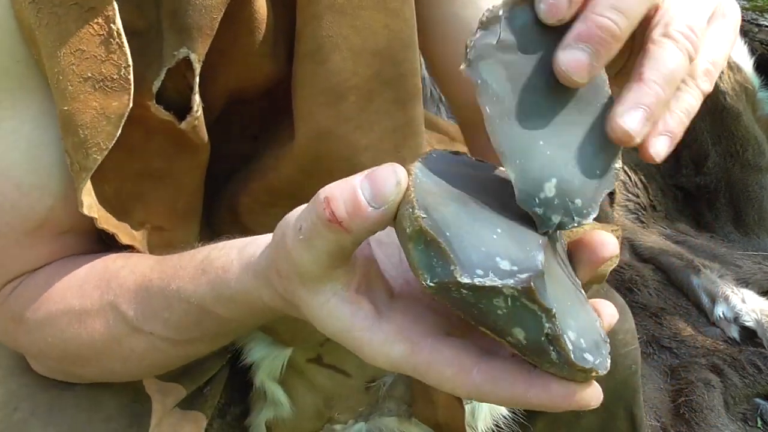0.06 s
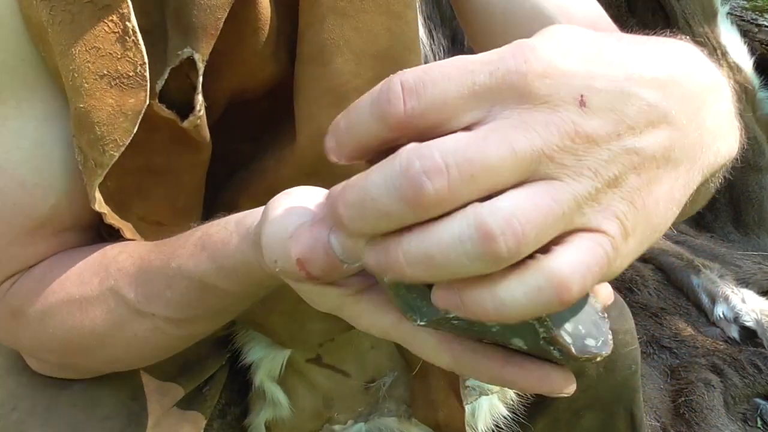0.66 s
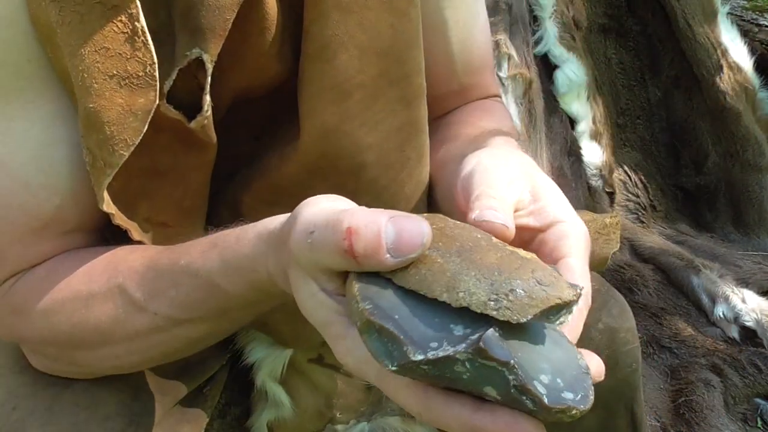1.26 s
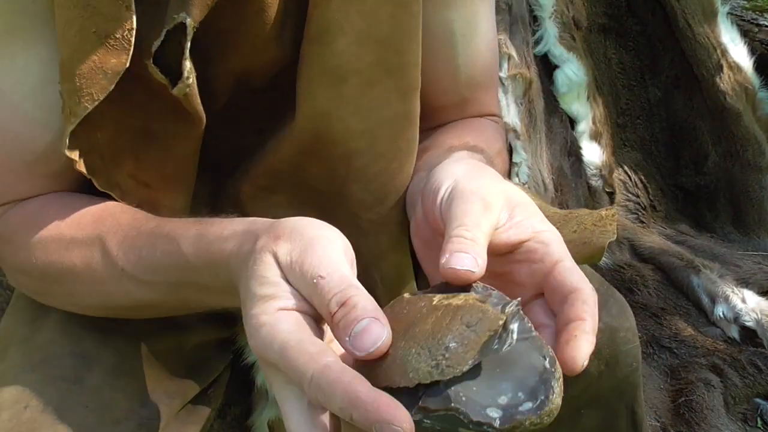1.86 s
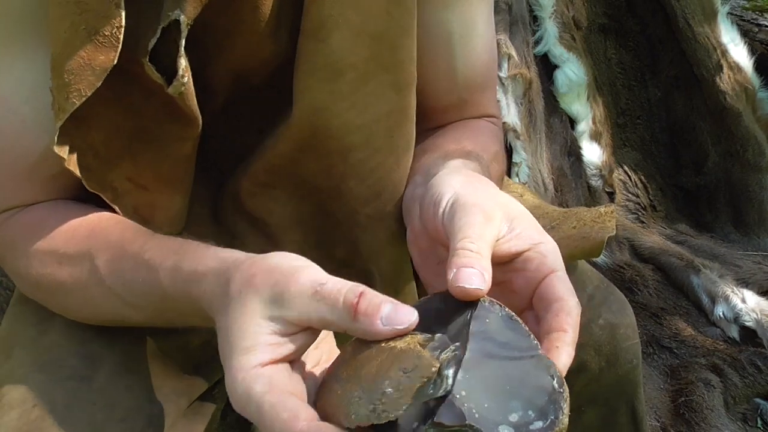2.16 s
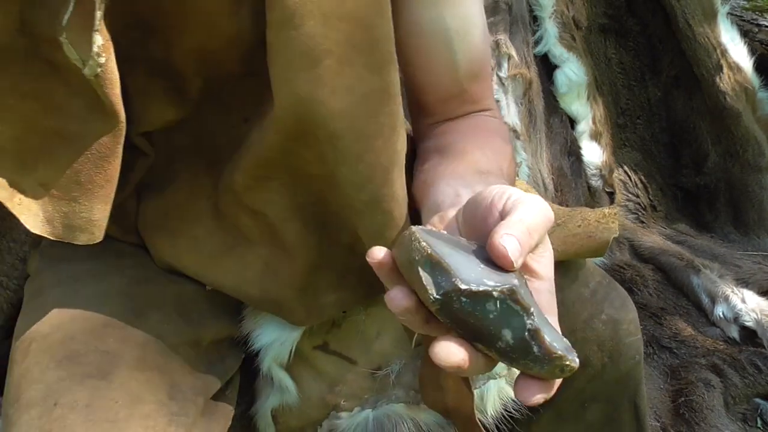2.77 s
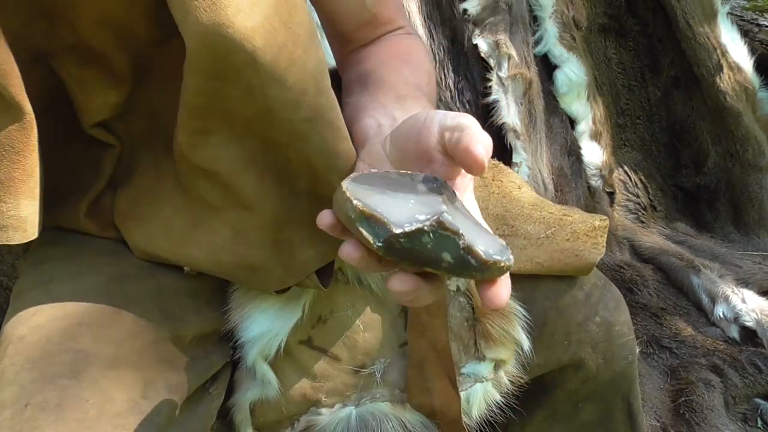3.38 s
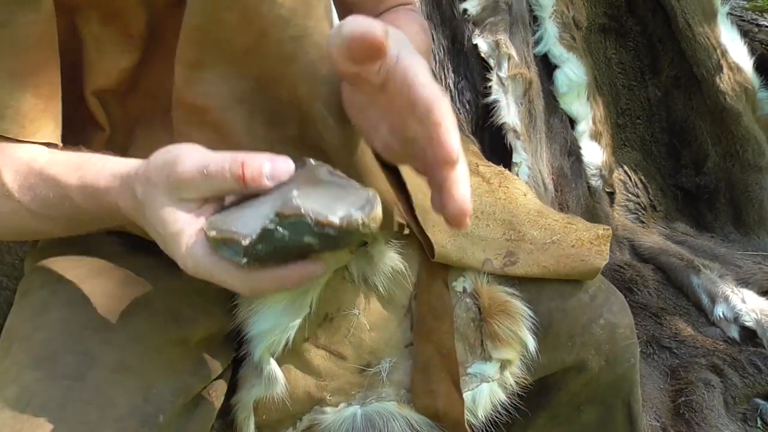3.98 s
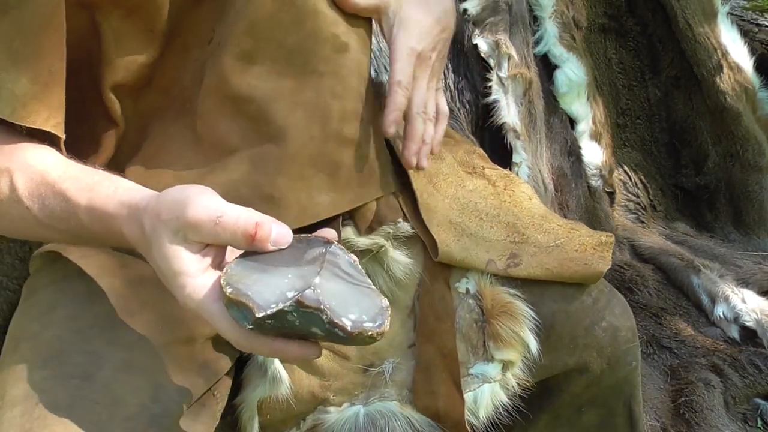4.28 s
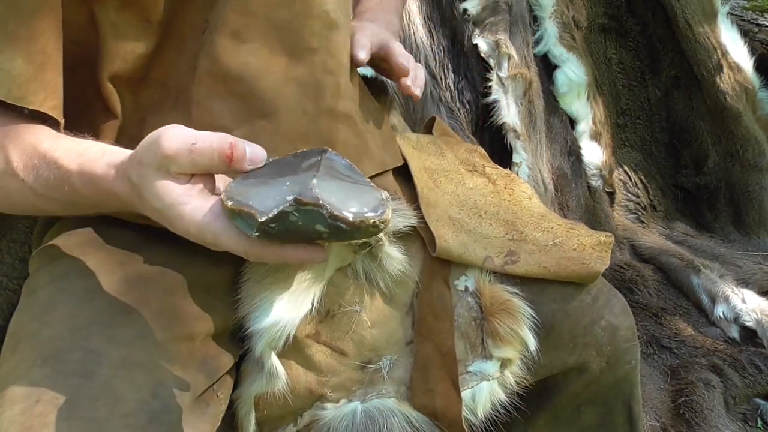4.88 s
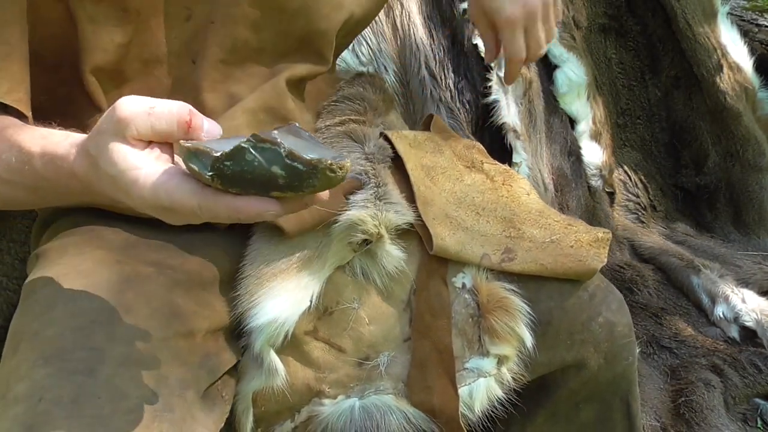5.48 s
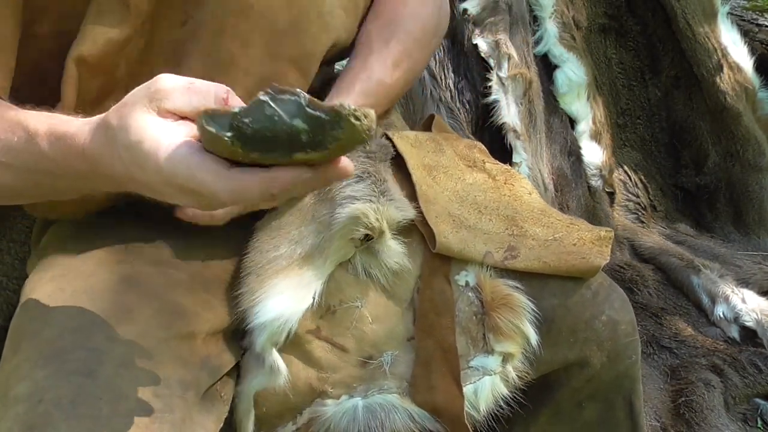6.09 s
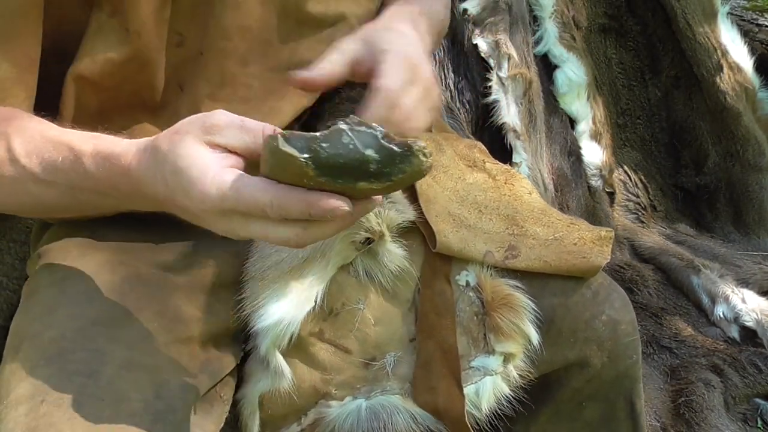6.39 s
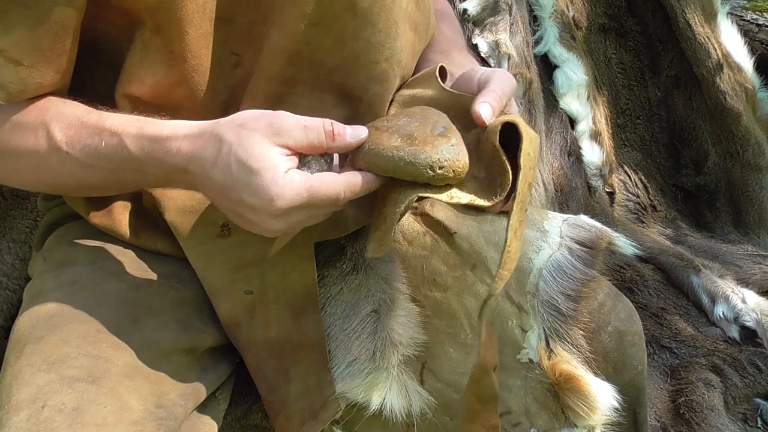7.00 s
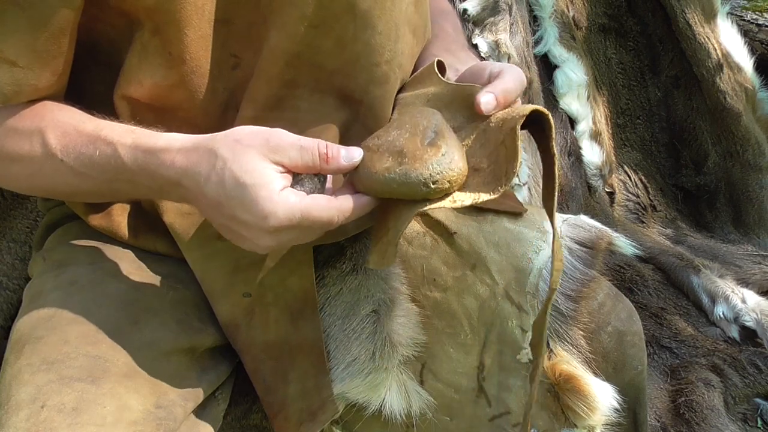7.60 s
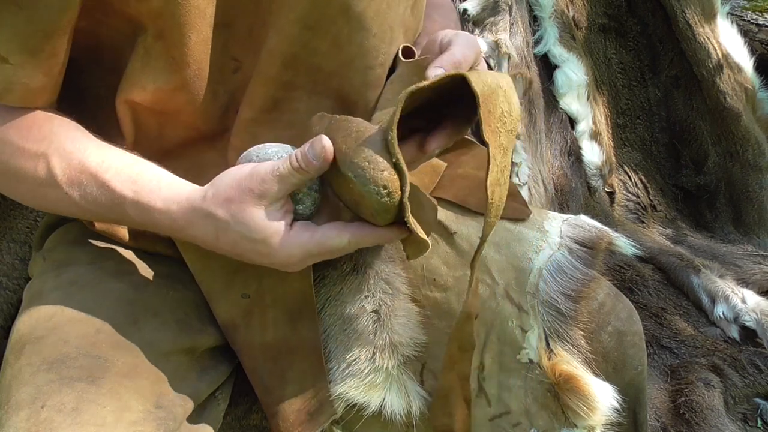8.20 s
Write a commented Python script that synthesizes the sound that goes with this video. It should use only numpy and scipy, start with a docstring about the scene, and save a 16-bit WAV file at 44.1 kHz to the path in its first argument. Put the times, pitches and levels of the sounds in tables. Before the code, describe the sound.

Two pieces of flint are handled very close to the microphone, outdoors. From about 0.4 seconds come light clicks and a gritty scrape, leading to a sharp, glassy clack at 0.8 seconds. Another clack with a short scuff follows at 1.3 seconds. Between 1.7 and 2.4 seconds the stones rasp and slide with slight squeaks and clicks, and the thin flake rings high and bright. Around 3.3 to 3.7 seconds the flake tumbles onto other stones in a quick clinking clatter with small thuds. From 4 seconds to the end, just after 8, it is quieter: leather is handled with scattered dry crackles, light stone chinks and soft bumps near 4.2, 5.8 and 6.2 seconds. Faint, distant birds whistle around 1.3 to 2.4 seconds and again from 6.7 seconds. A soft low rumble of open air and a fine hiss lie underneath.

```python
"""Close, glassy clacks and gritty scrapes: two flints laid together, slid and parted by hand outdoors.
Each contact clacks in the gap between them and rings the thin flake; sliding is a run of tiny slips.
The flake tumbles onto other stones, then leather is handled with soft bumps and dry crackles.
Birds whistle far away over a low rumble of open air."""
import sys
import numpy as np
from scipy import signal
from scipy.fft import rfft, irfft, next_fast_len
from scipy.io import wavfile
from scipy.ndimage import map_coordinates

SR = 44100
rng = np.random.default_rng(int(sys.argv[2]) if len(sys.argv) > 2 else 0)


def bounce(signal):
    """Save signal as a 16-bit WAV file at the path given by the first command-line argument."""
    frames = np.transpose(np.atleast_2d(signal))
    limited = np.clip(frames, -1, 1)
    pcm = np.round(limited * 32767).astype(np.int16)
    wavfile.write(sys.argv[1], SR, pcm)


N = 363825

# stone meets stone in the hand: (time [s], clack [dB], clack pitch [Hz], clack width [octaves],
# crack [dB], first mode [dB], second mode [dB])
CONTACTS = [(.407, -66.5, 3000, .6, -72, -43.5, -49), (0.4422, -38, 3060, 0.5, -44.5, -32, -42),
            (.4515, -48.5, 3140, .68, -46, -36, -40), (.618, -32.5, 1800, 0.62, -73, -52.5, -62),
            (0.6632, -27, 2100, 0.53, -61.5, -53, -45.5), (0.7704, -19, 3400, .45, -26, -22, -21),
            (.78, -32.5, 3500, .31, -49, -27.5, -25), (.7975, -26.5, 4100, .22, -43.5, -33.5, -23),
            (.8062, -35, 3620, .3, -54, -36, -31), (.847, -37, 3320, .09, -78.5, -70, -78),
            (1.2648, -21, 3045, .11, -28.5, -22, -27), (1.3138, -66.5, 2880, 0.16, -71.5, -46.5, -45.5),
            (1.3868, -31.5, 2530, 0.2, -74, -40, -58), (1.4604, -60.5, 2742, 0.11, -78, -29.5, -47),
            (1.777, -35.5, 3350, .09, -54.5, -29.5, -46), (1.7844, -22, 4130, 0.3, -39, -33, -24),
            (1.9207, -33, 3167, 0.039, -72.5, -31, -53), (1.978, -30, 3070, .07, -65, -40.5, -50),
            (1.986, -27, 3030, 0.085, -58.5, -27.5, -54.5), (1.995, -36.5, 3065, .14, -53, -21.5, -53.5),
            (2.347, -69, 4980, .5, -64, -25, -52), (2.361, -72, 4880, .34, -61.5, -22, -47),
            (2.376, -55.5, 4270, 0.087, -58, -22.5, -54), (2.3888, -68.5, 4150, 0.21, -51, -13, -35)]
# the flake falls on the heap: (time [s], clack [dB], clack pitch [Hz], crack [dB], thud [dB],
# first mode [dB], second mode [dB])
TUMBLE = [(3.3319, -48, 1020, -49.5, -24, -15, -40), (3.3775, -25.5, 1690, -45, -18, -35, -46),
          (3.393, -50, 1547, -53.5, -46, -26, -52), (3.4254, -25.5, 2700, -28, -39, -26, -12.5),
          (3.4305, -24.5, 2670, -39, -24.5, -26, -16), (3.4374, -32, 2500, -37, -37.5, -27.5, -16),
          (3.447, -62, 2489, -53.5, -53, -16.5, -23), (3.53, -47.5, 2220, -55.5, -37.5, -27, -44),
          (3.5948, -32, 2420, -74.5, -27.5, -50, -32), (3.6638, -82, 3006, -42, -56.5, -35, -47.5)]
# colour of each kind of sliding touch: (frequency [Hz], level [dB])
GRAZE = [(180, -72.5), (300, -44), (762, -20.5), (1170, -17), (4370, -5.5), (5700, -20.5), (8940, 1),
         (9880, -19), (12300, -8.5), (16000, -24)]
GRATE = [(120, -66.5), (200, -31), (581, 2), (738, 0), (1050, 5), (1980, -2.5), (2150, -8), (2480, -3),
         (3520, -12.5), (4400, -8.5), (5950, -43.5), (7800, -46.5), (9000, -27.5), (11700, -53),
         (19800, -120)]
CHATTER = [(200, -34.5), (900, -28), (1500, -11.5), (2000, -1.5), (2500, -18.5), (3000, -4.5), (3400, 0),
           (4200, -5), (5200, -8.5), (6800, -22.5), (9000, -18), (12400, -17.5), (14000, -35), (16000, -62)]
SCUFF = [(180, -58), (300, -41.5), (1080, 0.5), (1230, -4), (1380, 2.5), (1720, -7), (2980, -3),
         (6330, -35), (8000, -37), (10400, -52), (17600, -120)]
RASP = [(240, -74), (400, -44.5), (1020, -27), (1320, -15.5), (1450, -28.5), (2020, -13), (2200, -24),
        (3290, 1.5), (4730, -7.5), (5800, -28.5), (8000, -49.5), (10400, -89), (17600, -120)]
RUB = [(240, -77.5), (400, -51.5), (749, -15.5), (1710, -14.5), (2040, -1.5), (2260, -13.5), (2690, -1),
       (4550, -20.5), (7610, -69.5), (8000, -52), (10400, -78), (17600, -120)]
BRUSH = [(400, -30.5), (850, 0.5), (1200, -32.5), (1650, 1), (2200, -36), (3050, -3.5), (4000, -28),
         (8000, -49)]
SQUEAK = [(600, -65), (1500, -45), (1950, -9), (2400, -31), (2900, 6.5), (3150, 9), (3800, -32),
          (5700, -33.5), (6250, -16.5), (6900, -45.5), (12400, -35), (13500, -58)]
WIPE = [(2000, -35), (4300, -9.5), (5600, 3.5), (7000, -12.5), (10000, -8), (14000, -3.5), (16000, -28)]
GLIDE = [(700, -37.5), (1700, -30.5), (2100, 2.5), (2500, -34.5), (3600, -29.5), (4300, -7), (5400, -38),
         (6250, -10.5), (7200, -35.5), (8500, 2), (10000, -21), (13000, -55)]
# bird syllables: (delay [s], length [s], start pitch [Hz], end pitch [Hz], level [dB])
TWITTER = [(0, .025, 6470, 6090, -0.5), (0.013, .027, 5160, 3820, 1.5)]
SEESAW = [(0, .046, 6480, 7940, -2.5), (.058, .05, 5056, 5780, -3)]
CHIRP = [(0, .042, 5700, 4450, 0.0012)]


def flints():
    """Clacks and grinding, plus the flake's three modes, placed in stereo by level and phase."""
    modes_hz = [9041, 11993, 14358]  # modes of the thin flake: (pitch [Hz])
    # where the flake is: (time [s], left over right [dB], then the phase between the channels of
    # clacks [rad], first mode [rad], second mode [rad])
    place = [(.55, -3, 0.49, -2, .3), (.8, -0.5, 0.19, -0.87, 0.26), (1.9, -2, 0.042, -1, 0.44),
             (2.4, 1, 1, 0.91, 0.45), (3.3, 3.5, 0.8, 1.89, 2.4)]
    t = np.arange(N) / SR
    left_db, clack_phase, first_phase, second_phase = curves(place)
    grind, (first, second, third) = slides()
    first = softened(amp(-2) * struck_ring(0) + first, seconds=.002)
    second = softened(struck_ring(1) + second, seconds=.0012)
    out = panned(clacks() + grind, left_db, clack_phase)
    phases, sides_db = (first_phase, second_phase, 0 * t), (-2.5, -4.2, -2)
    for hz, envelope, phase, side_db in zip(modes_hz, (first, second, third), phases, sides_db):
        tone = np.exp(1j * (2 * np.pi * hz * t + np.array([phase, -phase]) / 2))
        out += (envelope * tone).real * amp(np.array([[side_db], [-side_db]]) / 2)
    return out


def clacks():
    """Each contact: a clack from the gap, a bright crack from the edge, a thud from palm or heap."""
    heap_modes = [(1046.6, 0.046, -17), (2065, 0.046, -7.5), (4757, 0.044, -18.5)]  # stones on the ground: (pitch [Hz], t60 [s], relative level [dB])
    # colours (frequency [Hz], level [dB]); a touch takes time, so the clack lacks highs
    touch = [(300, -5), (900, 2.5), (4700, 4), (6400, -16.5), (9000, -26.5)]
    edge = [(3000, -40.5), (6500, -6), (8200, -4), (10500, -1.5), (13000, -4.5), (14500, -13.5),
            (16000, -17.5)]
    out = np.zeros(N)

    def strike(s, clack_db, hz, octaves, crack_db):
        """Clack and crack, 4 ms after the rough edges graze."""
        gap = hump(hz, octaves, depth_db=54.5)
        clack = burst(lambda f: gap(f) + along(touch, f), t60=.0084, tail_db=1.5)
        crack = burst(lambda f: along(edge, f), t60=.016, tail_db=6)
        graze = burst(lambda f: along(edge, f), t60=.03, tail_db=15.5)
        add(out, s, amp(clack_db + 20.5) * clack)
        add(out, s, amp(crack_db + 18) * crack)
        add(out, s - .004, amp(min(crack_db, -40) + 2) * graze)

    def palm(s, db):
        """A low thud that the hand damps at once."""
        add(out, s, amp(db + 15.5) * burst(hump(220, .87, depth_db=63), t60=.05, tail_db=-13))

    palm(.7705, db=-17.5)  # the upper stone drops into the palm
    for s, clack_db, hz, octaves, crack_db, _, _ in CONTACTS:
        strike(s, clack_db, hz, octaves, crack_db)
        palm(s, clack_db - 35.5)
    for s, clack_db, hz, crack_db, thud_db, _, _ in TUMBLE:
        strike(s, clack_db, hz, octaves=.44, crack_db=crack_db)
        # the heap gives way, knocks on and rings
        thud = burst(hump(422, .36, depth_db=60), t60=.07, tail_db=-.5)
        add(out, s + .0015, amp(thud_db + 19) * thud)
        for ring_hz, t60, ring_db in heap_modes:
            ring = burst(hump(ring_hz, .11, depth_db=61), t60, tail_db=1.5)
            add(out, s, amp(clack_db + 28.5 + ring_db) * ring)
    return out


def struck_ring(mode):
    """Envelope of one mode of the flake: every contact stops the old ringing and starts it anew."""
    held_t60, free_t60 = (.036, .035), (.11, .054)  # per mode [s]: fingers damp the flake
    t = np.arange(N) / SR
    times = np.array([row[0] for row in CONTACTS + TUMBLE])
    levels_db = [row[-2:][mode] for row in CONTACTS + TUMBLE]
    latest = np.maximum(np.searchsorted(times, t) - 1, 0)
    age = t - times[latest]
    t60 = np.where(latest < len(CONTACTS), held_t60[mode], free_t60[mode])
    onset = amp(levels_db) * np.exp(2j * np.pi * rng.random(len(times)))
    return (age >= 0) * amp(-60 * np.abs(age) / t60) * onset[latest]


def slides():
    """Stick and slip, a run of tiny impacts: returns the grinding and the three modes' envelopes."""
    # sliding touches, stone scrapes and one faint, airy finger brush (WIPE):
    # (start [s], push [s], release [s], grind [dB], grind swell [dB], first mode [dB],
    # second mode [dB], mode swell [dB], slip rate [1/s], slip scatter [dB], colour)
    strokes = [(0.382, 0.029, 0.025, -64.5, 15.5, -51, -53, 11.5, 1200, 4.5, GRAZE),
               (.44, 0.015, 0.048, -41.5, 3, -44.5, -50.5, 0, 1400, 3, GRAZE),
               (.556, .11, .05, -33, 10.5, -56.5, -57, -6, 890, 2.5, GRATE),
               (.772, 0.033, .08, -37.5, 0, -41.5, -38.5, -6, 880, 1.43, CHATTER),
               (1.155, .065, 0.07, -65.5, 14, -84, -85.5, -1.5, 2000, -0.5, WIPE),
               (1.26, 0.0066, 0.04, -33.5, 10, -39.5, -48, 4, 2200, 4.74, SCUFF),
               (1.384, .004, 0.045, -41.5, 8.5, -57, -64.5, 2.5, 1720, 1, SCUFF),
               (1.7, .07, 0.039, -42, 18, -40.5, -51, -3.5, 2100, 1.5, RUB),
               (1.762, 0.04, 0.031, -28.5, 9.5, -47.5, -50, -2, 680, -5.9, RASP),
               (1.828, 0.025, 0.079, -47.5, 2.5, -88.5, -77.5, 0, 2300, 1, SQUEAK),
               (1.882, 0.14, 0.059, -42, 2, -32, -46, 19.5, 2500, 0, SQUEAK),
               (2.212, .02, 0.065, -59.5, 9.5, -69.5, -69, 2, 1200, 5.5, BRUSH),
               (2.25, 0.063, .09, -52.5, 27, -43.5, -71, 17, 900, 1, GLIDE),
               (2.315, 0.056, 0.029, -65.5, 0, -30.5, -50, 17.5, 820, -6.5, GLIDE),
               (2.415, .018, .04, -91, 0, -60, -78.5, 13, 900, 2.5, GLIDE)]
    grind, rings = np.zeros(N), np.zeros((3, N), complex)
    pole = np.exp(-np.pi * 55 / SR)  # a rubbed mode is 55 Hz wide
    lowpass = signal.butter(2, 900, fs=SR, output="sos")
    n = SR // 4
    t = np.arange(n) / SR
    judders = amp(2.5 * wobble(per_s=130))  # the stones catch and give way unevenly
    for (s, push, release, grind_db, swell_db, first_db, second_db, ring_swell_db,
         rate, scatter_db, colour) in strokes:
        judder = unit(judders[int(s * SR):][:n])
        force = amp(grind_db) * stroke(t, push, release, swell_db) * judder
        shake = stroke(t, push, release, ring_swell_db) * judder
        slipping = rng.random(n) < rate / SR
        sizes = amp(scatter_db * np.clip(rng.standard_normal(n), -2, 2))
        slips = unit(slipping * sizes) + .21 * rng.standard_normal(n)
        scrape = signal.fftconvolve(force * unit(slips), pulse(lambda f: along(colour, f)))[:n]
        # only a firm push moves the whole stone and brings out the lows
        low_cut = 1 - (force / force.max()) ** .75
        add(grind, s, scrape - low_cut * signal.sosfiltfilt(lowpass, scrape))
        # the third mode wakes only under hard grinding
        levels = amp(first_db) * shake, amp(second_db) * shake, amp(33) * force ** 3
        for ring, level in zip(rings, levels):
            kicks = slips * np.exp(2j * np.pi * rng.random(n))
            swing = unit(signal.lfilter([1], [1, -pole], kicks))
            capped = swing / np.sqrt(np.abs(swing) ** 2 + .3)  # friction caps the swing
            add(ring, s, np.sqrt(2) * level * unit(capped))
    return grind, rings


def stroke(t, push, release, swell_db):
    """Envelope of a slide: the edges bite, the pressure swells, the hand lets go."""
    bite_share, release_db = .16, 43.5
    bite = np.sin(np.pi / 2 * np.clip(t / (bite_share * push), 0, 1)) ** 2
    push_left = np.clip(1 - t / push, 0, 1)
    letting_go = np.clip((t - push) / release, 0, None) ** 1.15
    return bite * amp(-swell_db * push_left - release_db * letting_go)


def handling():
    """Hands and stone bump softly on the hides, stones chink and the leather crackles."""
    bumps = [(4.205, -34.5, 390), (4.409, -53.5, 353.4), (4.976, -61.5, 509), (5.058, -63, 297),
             (5.787, -40, 339), (6.208, -48, 420), (6.229, -39, 427)]  # knocks on the hides: (time [s], peak [dB], pitch [Hz])
    chinks = [(0.034, -51, 8700), (.761, -34.5, 2732), (2.149, -50.5, 3050), (3.652, -52.5, 1980),
              (3.96, -59.5, 1494), (4.158, -58.5, 7600), (4.207, -45, 9000), (4.497, -57.5, 6430),
              (5.784, -47.5, 1078), (6.229, -50, 803), (6.642, -43.5, 9630), (6.717, -45.5, 8600)]  # light touches of stone: (time [s], peak [dB], pitch [Hz])
    sharp_crackles = [(0.151, -59.5, -8), (0.2213, -55.5, 1), (1.1331, -51.5, 10.5), (1.517, -43, -6),
                      (1.9654, -33.5, -6), (2.677, -49.5, 4.5), (2.8, -34, -0.5), (3.1023, -41, -7),
                      (3.5824, -42, 9), (3.6318, -37.5, -7), (4.011, -45, -1.5), (4.3845, -49.5, -1.5),
                      (4.7427, -45, -4.5), (5.1777, -28, -12), (5.2198, -42, -2.5), (5.4134, -48.5, 8),
                      (5.447, -45, 2), (5.5545, -40, -1), (5.8706, -47, -16), (6.3363, -35, -6),
                      (6.4167, -37.5, -0.5), (6.9583, -42, -1), (7.2604, -40.5, 6), (7.3857, -43.5, -1),
                      (7.612, -49, 14.5), (7.743, -40.5, 4.5), (7.8405, -32, 1), (7.865, -44, 5.5),
                      (7.9906, -39, -2), (8.1709, -38.5, 1)]  # handling crackles: (time [s], peak [dB], low shelf [dB])
    crackle_colour = [(290, -64.5), (500, -20), (2430, -7.5), (2850, -8), (6610, -6), (7420, -8),
                      (11300, -5), (14200, -8), (16000, -12)]  # dry and bright: (frequency [Hz], level [dB])
    faint_per_s, faint_db, spread_db = 3.3, -58.5, 6.5
    out = np.zeros(N)

    def hit(s, peak_db, colour, t60, tail_db):
        """One burst, set by its peak."""
        sound = burst(colour, t60, tail_db)
        add(out, s, amp(peak_db) * sound / np.abs(sound).max())

    for s, db, hz in bumps:
        hit(s, db, hump(hz, .31, depth_db=59.5), t60=.062, tail_db=-1)
    for s, db, hz in chinks:
        hit(s, db, hump(hz, .17, depth_db=45), t60=.043, tail_db=1.5)
    faint_crackles = [(when * N / SR, faint_db + spread_db * (2 * size - 1), -1.5)
                      for when, size in rng.random((int(faint_per_s * N / SR), 2))]
    for s, db, low_db in sharp_crackles + faint_crackles:
        shelf = [(3000, low_db), (9000, 0)]
        hit(s, db, lambda f: along(crackle_colour, f) + along(shelf, f), t60=.027, tail_db=3.5)
    return out


def reflections(x):
    """The ground returns the mids once, along with a tight body, short ambience and high shimmer."""
    # colours: (frequency [Hz], level [dB])
    shimmer_colour = [(300, -18), (2000, -13), (9000, -18), (10300, 9), (10900, -2), (11300, 8),
                      (12000, -11.5), (12450, 8.5), (12800, 0), (13500, 11), (14200, 0.5), (14700, 19),
                      (15200, -14)]
    ground_colour = [(300, -7.5), (1200, -.5), (2500, -7), (6000, -27.5)]
    body_colour = [(200, 1), (600, 6), (2500, -1), (5000, 1.5), (8000, -8), (14000, -11)]
    delay_s = .0048
    ground = filtered(x, lambda hz: amp(along(ground_colour, hz)) * np.exp(-2j * np.pi * hz * delay_s))
    body = echo(x, t60=.0033, colour=body_colour)
    ambience = echo(x, t60=.22, colour=[(200, -6.5), (2500, 1), (6000, 1), (14000, -2.5)])
    shimmer = echo(x, t60=1.7, colour=shimmer_colour)
    return amp(-16) * ground + amp(-13.5) * body + amp(-26.5) * ambience + amp(-38) * shimmer


def birds():
    """Thin gliding whistles and repeated syllables, blurred by distance."""
    # single whistles: (time [s], length [s], start pitch [Hz], end pitch [Hz], level [dB])
    whistles = [(1.302, 0.11, 2890, 3800, -66), (1.666, .037, 5960, 6030, -58.5),
                (6.723, 0.12, 2774, 2723, -58), (6.86, .12, 3194, 3117, -63.5),
                (6.963, 0.06, 4040, 4280, -65.5), (7.227, 0.043, 3806, 4380, -61.5),
                (7.44, 0.16, 6320, 6160, -66.5), (7.912, 0.041, 3563, 3600, -56.5)]
    # song: (start [s], repeats, period [s], level [dB], change per repeat [dB], syllable)
    phrases = [(2.142, 3, 0.098, -55.5, -3, TWITTER), (7.331, 3, .19, -75, 11.5, SEESAW),
               (7.906, 3, .104, -60, -3.5, CHIRP)]
    out = np.zeros(N)
    blur = .45 + .45 * (wobble(330) + 1j * wobble(330))  # many paths through the leaves
    repeated = [(s + k * period + delay, length, start_hz, end_hz, db + k * change_db + note_db)
                for s, repeats, period, db, change_db, syllable in phrases
                for k in range(repeats)
                for delay, length, start_hz, end_hz, note_db in syllable]
    for s, length, start_hz, end_hz, db in whistles + repeated:
        n = int(length * SR)
        tone = np.exp(2j * np.pi * np.cumsum(np.geomspace(start_hz, end_hz, n)) / SR)
        blurred = (tone * np.roll(blur, -int(s * SR))[:n]).real
        add(out, s, amp(db) * signal.windows.tukey(n, .7) * blurred)
    return out


def grainy_hiss():
    """A fine hiss, made grainy by tiny ticks, that swells around the scrapes, tumble and handling."""
    swell = [(0, -76.5), (.3, -90), (1.3, -85.5), (1.9, -79), (2.4, -81), (3.25, -89.5), (3.6, -74),
             (4.3, -93.5), (5.7, -90.5), (6, -79), (6.5, -90.5), (7.3, -79), (8.25, -81)]  # rise and fall of the hiss: (time [s], level [dB])
    colour = [(100, 1.5), (500, 5.5), (2000, -2.5), (8000, 1.5), (13000, -3.5), (15500, -13)]
    ticks_per_s, tick_t60 = 45, .011
    hiss_db, = curves(swell)
    ticks = (rng.random(N) < ticks_per_s / SR) * amp(18 * rng.random(N))
    decay = amp(-60 * np.arange(SR // 50) / SR / tick_t60)
    grain = unit(.21 + unit(signal.fftconvolve(ticks, decay)[:N]))
    return amp(hiss_db - 4 + 2.1 * wobble(per_s=5.4)) * grain * hush(colour, side_db=-7.5)


def open_air():
    """A low, gently wavering rumble."""
    colour = [(20, 2.5), (95, -1), (150, -11.5), (270, -24.5), (400, -30), (800, -39), (1600, -41),
              (2400, -44), (6000, -46), (12000, -44.5), (15300, -44.5), (16200, -53)]  # bass-heavy air: (frequency [Hz], level [dB])
    swell = [(0, -69), (5.5, -67.5), (7.2, -66), (8.25, -67)]  # its slow drift: (time [s], level [dB])
    air_db, = curves(swell)
    return amp(air_db + 1.1 * wobble(per_s=2.9)) * hush(colour, side_db=-16)


def amp(db):
    """Decibels to gain."""
    return 10 ** (np.asarray(db) / 20)


def unit(x):
    """Scale to rms 1."""
    return x / np.sqrt(np.mean(np.abs(x) ** 2) + 1e-20)


def along(points, hz):
    """Read (frequency, value) points on a log axis."""
    f, v = np.transpose(points)
    return np.interp(np.log(hz + 1), np.log(f + 1), v)


def curves(rows):
    """One value per sample for each column after the time."""
    s, *cols = np.transpose(rows)
    return [np.interp(np.arange(N) / SR, s, c) for c in cols]


def wobble(per_s):
    """A smooth random curve with per_s knots a second."""
    knots = rng.standard_normal(int(N * per_s / SR) + 4)
    fine = np.arange(0, len(knots) - 1, 1 / 8)
    return np.interp(np.arange(N) * per_s / SR, fine, map_coordinates(knots, [fine]))


def filtered(x, response):
    """Shape x by the gain response(Hz)."""
    m = next_fast_len(N + SR // 2)
    return irfft(rfft(x, m) * response(np.fft.rfftfreq(m, 1 / SR)), m)[..., :N]


def pulse(colour, size=4096):
    """A minimum-phase click of energy 1 whose spectrum follows colour(Hz) in dB."""
    gain = np.maximum(amp(colour(np.fft.rfftfreq(size, 1 / SR))), 1e-6)
    cepstrum = irfft(np.log(gain))
    cepstrum[1:size // 2] *= 2
    cepstrum[size // 2 + 1:] = 0
    click = irfft(np.exp(rfft(cepstrum)))
    return click / np.linalg.norm(click)


def hump(centre_hz, octaves, depth_db):
    """A bell-shaped colour on a floor depth_db down."""
    floor = amp(-depth_db) ** 2
    return lambda hz: 10 * np.log10(np.exp(-.5 * (np.log2((hz + 1) / centre_hz) / octaves) ** 2) + floor)


def burst(colour, t60, tail_db):
    """A click followed by a dying rattle of the same colour, energy 1."""
    click = pulse(colour)
    n = len(click)
    rattle = rng.standard_normal(n) * amp(-60 * np.arange(n) / SR / t60)
    rattle = signal.fftconvolve(rattle, click)[:n]
    sound = click + amp(tail_db) * rattle / np.linalg.norm(rattle)
    return sound / np.linalg.norm(sound)


def softened(envelope, seconds):
    """A touch takes time: the envelope cannot jump."""
    window = signal.windows.hann(int(seconds * SR) + 3)
    return signal.fftconvolve(envelope, window / window.sum(), "same")


def add(track, s, sound):
    """Mix a sound into a track at time s."""
    part = track[max(round(s * SR), 0):][:len(sound)]
    part += sound[:len(part)]


def panned(x, left_db, phase):
    """Mono to stereo by a level and a phase offset between the channels."""
    gains = amp(np.array([left_db, -left_db]) / 2)
    pair = (signal.hilbert(x) * np.exp(.5j * np.array([phase, -phase]))).real
    return pair * gains / np.sqrt(np.mean(gains ** 2, axis=0))


def echo(x, t60, colour):
    """A diffuse tail, cut at half a second, unrelated left and right."""
    t = np.arange(SR // 2) / SR
    tail = rng.standard_normal((2, len(t))) * amp(-60 * t / t60) * (1 - np.exp(-t / .00073))
    gain = amp(along(colour, np.fft.rfftfreq(SR, 1 / SR)))
    tail = irfft(rfft(tail / np.linalg.norm(tail[0]), SR) * gain, SR)[:, :len(t)]
    return signal.oaconvolve(np.atleast_2d(x), tail, axes=1)[:, :N]


def hush(colour, side_db):
    """Narrow stereo noise of rms 1."""
    mid, side = filtered(rng.standard_normal((2, N)), lambda hz: amp(along(colour, hz)))
    return unit(np.array([mid + amp(side_db) * side, mid - amp(side_db) * side]))


def scene():
    """Stones and hands up close, birds far off among leaves, open air behind."""
    near, song = flints() + handling(), birds()
    space = reflections(near.mean(axis=0))
    leaves = echo(song, t60=.14, colour=[(2000, 0), (9000, -2)])
    return near + space + amp(-2) * song + amp(-3) * leaves + open_air() + grainy_hiss()


def record(dry):
    """A steep low-pass takes off the very top."""
    top_hz = 16100
    return filtered(dry, lambda hz: 1 / np.sqrt(1 + (hz / top_hz) ** 160))


dry = scene()
out = record(dry)
bounce(out)
```